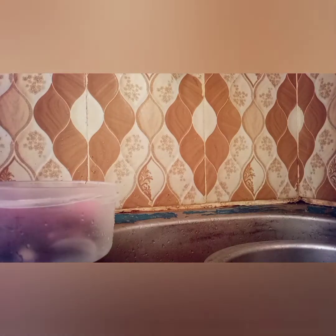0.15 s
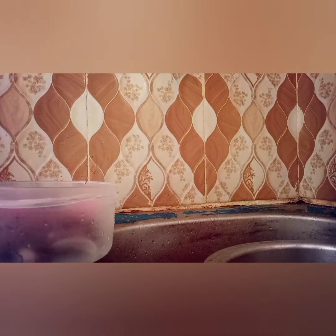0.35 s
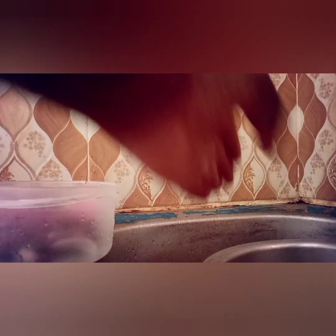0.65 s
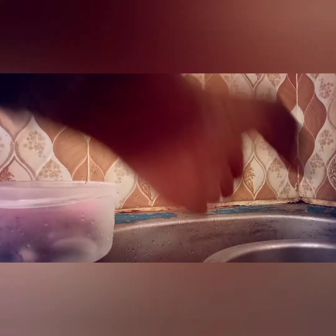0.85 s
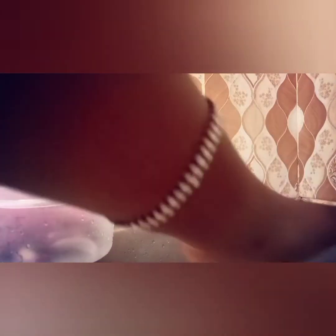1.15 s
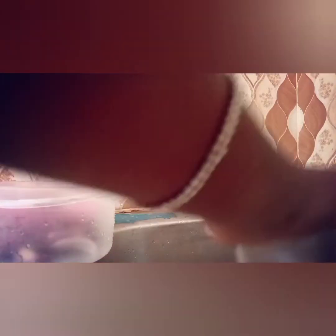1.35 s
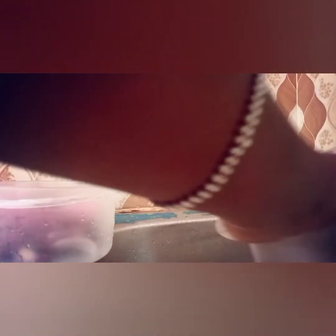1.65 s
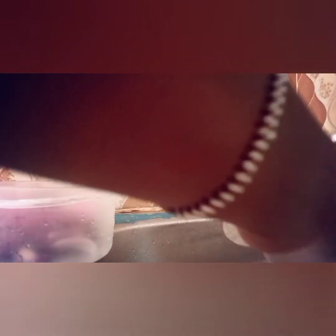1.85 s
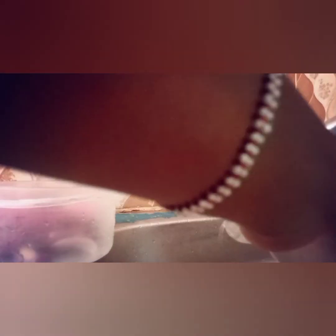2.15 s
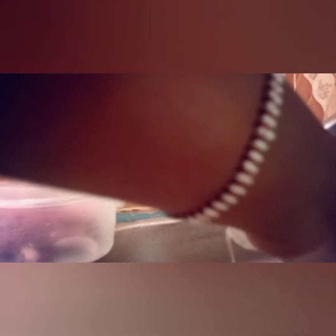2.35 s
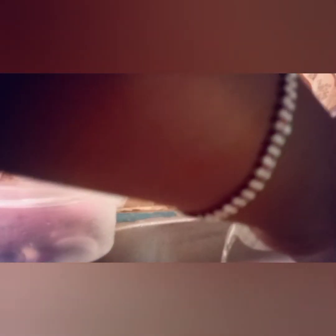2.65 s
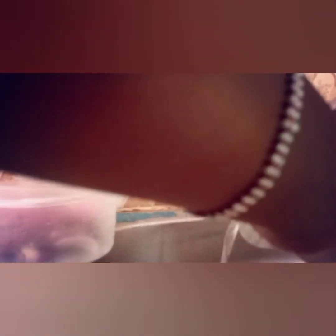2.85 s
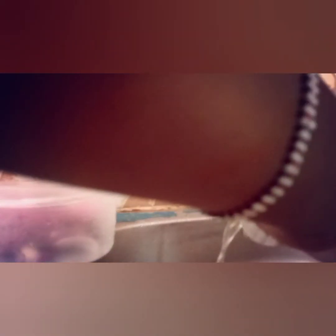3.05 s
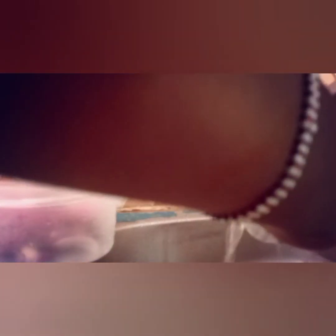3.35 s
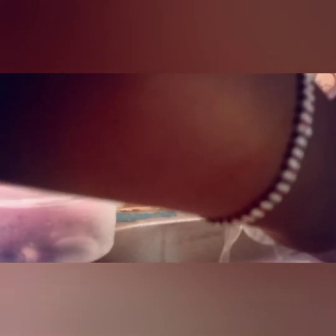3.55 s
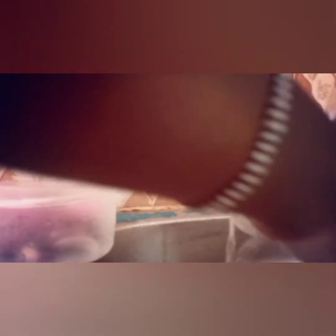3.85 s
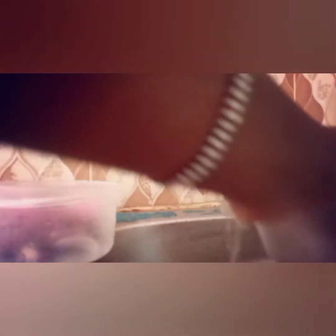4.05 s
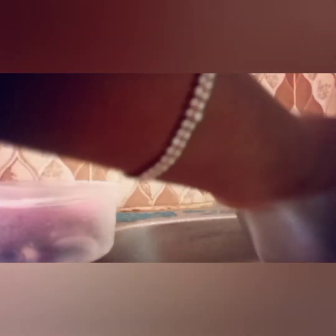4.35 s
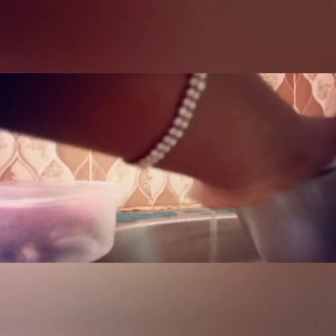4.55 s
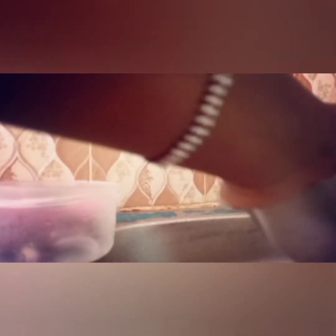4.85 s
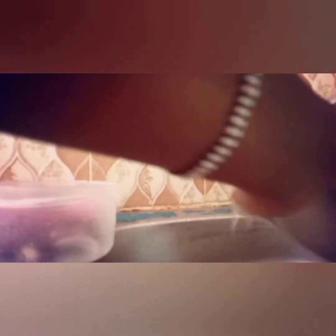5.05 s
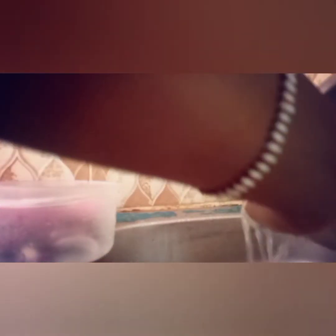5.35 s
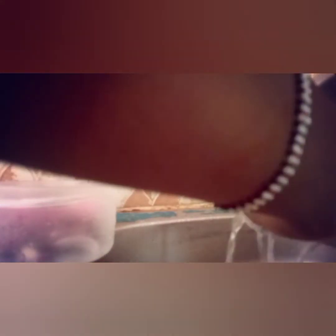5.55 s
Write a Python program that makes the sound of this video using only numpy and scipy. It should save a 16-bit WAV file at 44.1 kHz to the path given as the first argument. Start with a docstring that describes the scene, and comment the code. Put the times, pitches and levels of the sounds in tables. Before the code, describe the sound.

Close, small kitchen sink over a faint low drone. Wet crackling swishes of a hand come first, then dribbles and slaps of water on steel around two seconds, a cluster of bowl knocks with a glug near three, and finally heavier splashing pours. Stereo, with short tiled echoes.

```python
"""At a steel kitchen sink, in a room with a low drone, small dried fish are rinsed by hand in a bowl of water.
The hand swishes and squelches: crackling friction noise through broad peaks and the rubbed bowl's resonances.
Spilled water patters and drums on the steel, first in dribbles, then in longer pours: random impacts through
damped resonances. Air pockets ring as gliding sines; the bowl knocks and drips plink as sums of dying modes.
Two spaced microphone ports hear it all with echoes from the basin and the tiles."""
import sys
import numpy as np
from scipy import signal
from scipy.fft import rfft, irfft, next_fast_len
from scipy.io import wavfile
from scipy.ndimage import map_coordinates

SR = 44100
rng = np.random.default_rng(int(sys.argv[2]) if len(sys.argv) > 2 else 0)


def waveform_to_disk(signal):
    """Save audio, clipped to [-1, 1], as 16-bit WAV at the path in sys.argv[1]."""
    frames = np.transpose(np.atleast_2d(signal))
    scaled = np.clip(frames, -1, 1) * 32767
    samples = np.round(scaled).astype(np.int16)
    wavfile.write(sys.argv[1], SR, samples)


N = 251370  # samples
TOP_HZ = 15800  # band limit
PORT_LAG_S, BOWL_LAG_S = 0.0008845, 0.000857  # lead of the right port; the bowl stands nearer the middle

# resonances of the steel basin: (frequency [Hz], width [Hz], level [dB])
BASIN_MODES = [(110, 170, -25), (199.5, 19, -4.5), (241.6, 39, -6), (300.9, 28.7, 2.5), (362.4, 78, -10.5),
               (415.4, 26, -12), (600, 320, -22.5)]
# spectrum of fine spray: (frequency [Hz], level [dB per Hz])
SPRAY_SPECTRUM = [(800, -50), (2000, 2.5), (3000, -4.5), (5000, -0.5), (8000, 7), (12000, 7), (16000, 3.5)]


def amp(db):
    """The decibel law: level to amplitude gain."""
    return 10 ** (np.asarray(db) / 20)


def unit(x):
    """Normalization by mean power: scale to rms 1."""
    return x / np.sqrt(np.mean(x ** 2) + 1e-20)


def along(points, hz):
    """Interpolation of (Hz, value) points on a logarithmic frequency axis."""
    f, v = np.transpose(points)
    return np.interp(np.log(hz + 1), np.log(f + 1), v)


def wobble(rate):
    """Band-limited fluctuation: a smooth random curve with rate knots a second."""
    knots = rng.standard_normal(int(N * rate / SR) + 4)
    return map_coordinates(knots, [np.arange(N) * rate / SR])


def filtered(x, response):
    """Linear filtering: multiply the spectrum of x by a response of frequency."""
    n = x.shape[-1]
    m = next_fast_len(n + SR // 4)
    return irfft(rfft(x, m) * response(np.fft.rfftfreq(m, 1 / SR)), m)[..., :n]


def coloured(x, spectrum):
    """Spectral shaping: lay a (Hz, dB) spectrum on x."""
    return filtered(x, lambda hz: amp(along(spectrum, hz)))


def resonate(x, modes):
    """Modal superposition: a bank of damped resonances of alternating sign, driven by x."""
    def response(f):
        total = 0
        for k, (centre, width, db) in enumerate(modes):
            damping = 1j * f * width
            total = total + (-1) ** k * amp(db) * damping / (centre * centre - f * f + damping)
        return total
    return filtered(x, response)


def hump(x, centre_hz, octaves):
    """Broad resonance: one peak with soft skirts, cut in the bass."""
    def response(f):
        peak = 1 / (1 + (np.log2((f + 1) / centre_hz) / octaves) ** 2)
        return peak * f ** 2 / (f ** 2 + (centre_hz / 8) ** 2)
    return filtered(x, response)


def add(track, s, sound):
    """Superposition: mix a sound into the track at time s."""
    start = max(round(s * SR), 0)
    part = track[start:start + len(sound)]
    part += sound[:len(part)]


def impacts(rate, spread_db, size=N):
    """Shot noise: random tiny impacts, many weak and a few strong, of rms 1."""
    chance, strength = rng.random(size), rng.exponential(size=size)
    sign = rng.choice([-1, 1], size)
    return unit((chance < rate / SR) * sign * amp(spread_db * np.minimum(strength, 4)))


def fizz(rate, centre_hz, scatter, cycles, spread_db):
    """Bubble resonance: a cloud of small bubbles, each a short sine that rises as it dies, of rms 1."""
    when, size, pitch = rng.random((int(rate * N / SR), 3)).T
    hz = np.minimum(centre_hz * (pitch / (1 - pitch)) ** scatter, TOP_HZ)[:, None]
    age = np.arange(SR // 80)
    turns = hz * age / SR
    rings = np.sin(2 * np.pi * turns * (1 + 4 * age / SR)) * np.exp(-turns / cycles)
    rings *= amp(-spread_db * np.log(size + 0.029))[:, None]
    samples = (when * N).astype(int)[:, None] + age
    return unit(np.bincount(samples.ravel(), rings.ravel(), N)[:N])


def at_ports(x, lag_s):
    """Time difference of arrival: the sound reaches the right port first."""
    sides = np.array([[-1], [1]])
    return filtered(x, lambda hz: np.exp(1j * np.pi * hz * lag_s * sides))


def room():
    """Shaped noise: a low drone that wavers, with a weak mains hum and a faint steady hiss."""
    # level of the drone: (time [s], level [dB])
    drone_levels = [(0, -52), (.45, -57), (.67, -47.5), (.87, -61.5), (1.03, -49.5), (1.18, -55.5),
                    (1.27, -49), (1.47, -54.5), (1.85, -52), (2.12, -49), (2.5, -53.5), (2.9, -51.5),
                    (3.7, -55.5), (4.8, -56), (5.7, -50.5)]
    # brief swells and dips of the drone: (time [s], change [dB])
    surges = [(0.241, 6.5), (0.618, -9), (1.015, 8), (1.295, 6), (1.411, 12), (1.56, 5.5), (2.09, 9),
              (2.55, -16)]
    # spectra of drone and hiss: (frequency [Hz], level [dB per Hz])
    rumble_spectrum = [(20, -21), (38, -11.5), (50, -13.5), (62, -6.5), (100, 5), (130, 5), (165, -6),
                       (200, -2), (240, -26.5), (400, -38), (700, -84), (1500, -90)]
    hiss_spectrum = [(100, 21), (600, 9), (1200, 5), (3000, -1.5), (4300, 7.5), (6000, -54), (8600, 14),
                     (10000, -22), (16000, -6)]
    surge_s, waver_db, waver_hz = 0.013, 3.5, 14
    hum_hz, hum_db, hiss_db = 101.6, -68, -67.5
    diffuse_db = -16  # share of the drone that differs between the ports
    t = np.arange(N) / SR
    drone_db = np.interp(t, *np.transpose(drone_levels))
    surge_db = sum(db * np.exp(-((t - s) / surge_s) ** 2) for s, db in surges)
    level = amp(drone_db + surge_db + waver_db * wobble(waver_hz))
    drone = unit(coloured(rng.standard_normal(N), rumble_spectrum))
    diffuse = amp(diffuse_db) * unit(coloured(rng.standard_normal((2, N)), rumble_spectrum))
    hum = amp(hum_db) * unit(np.sin(2 * np.pi * hum_hz * t + 0.54 * wobble(2.3)))
    hiss = amp(hiss_db) * unit(coloured(rng.standard_normal((2, N)), hiss_spectrum))
    return at_ports(level * drone + hum, PORT_LAG_S) + level * diffuse + hiss


def pouring():
    """Exponential build-up and decay: each pour grows, holds and dries off over a steady dribble."""
    # water tipped over the rim of the bowl: (time [s], length [s], drumming [dB], wash [dB],
    # spray [dB], gurgle [dB])
    pours = [(1.869, 0.012, -54.5, -72, -84, -58), (1.964, 0.16, -65.5, -84, -78, -58.5),
             (2.082, 0.045, -48, -58, -59.5, -67), (2.194, 0.049, -42, -63, -58.5, -53.5),
             (2.45, 0.073, -58, -64.5, -79, -78), (2.628, 0.14, -58, -94, -59.5, -89),
             (2.782, 0.267, -44, -52, -52.5, -61.5), (3.086, 0.202, -48, -56.5, -54, -53),
             (3.36, 0.045, -48, -58, -63, -72), (3.506, 0.02, -41.5, -61, -52.5, -47),
             (3.555, 0.11, -54, -60.5, -60.5, -50.5), (4.112, 0.35, -59, -65, -59, -76),
             (4.733, 0.16, -50, -61, -53.5, -62.5), (4.817, 0.25, -46, -60, -46, -57.5),
             (5.141, 0.25, -42, -46.5, -44, -52.5), (5.4, 0.36, -40.5, -52.5, -47, -51.5)]
    rise_db_per_s, fall_db_per_s = 331, 200
    dribble_db = [[-68.5], [-76.5], [-68], [-88.5]]  # drumming, wash, spray, gurgle
    t = np.arange(N) / SR
    power = amp(dribble_db) ** 2
    for s, length, *levels_db in pours:
        before, after = np.maximum(s - t, 0), np.maximum(t - s - length, 0)
        shape_db = -rise_db_per_s * before - fall_db_per_s * after
        power = np.maximum(power, np.outer(amp(levels_db), amp(np.maximum(shape_db, -100))) ** 2)
    return 10 * np.log10(power)


def without_lows(x):
    """High-pass filtering: cut wash and gurgle steeply below the low mids, scale to rms 1."""
    cutoff_hz = 680
    return unit(filtered(x, lambda hz: hz ** 6 / (hz ** 6 + cutoff_hz ** 6)))


def spill():
    """Impact-driven resonance: falling water drums, washes through shifting hollows, gurgles and sprays."""
    # hollows in the sheet of water over the basin: (frequency [Hz], width [Hz], level [dB])
    wash_modes = [(700, 110, -9), (870, 155, -1), (1274, 115, 4), (1750, 140, -3.5), (1983, 160, -6),
                  (2235, 80, -10), (2800, 120, -10), (3630, 180, -14), (4050, 210, -10.5)]
    wash_drops_per_s, gurgles_per_s, gurgle_hz = 1100, 480, 990
    wash_shift, wash_gush_db = 0.039, 4.5  # fractional shift of the hollows; modulation by the slugs
    drum_db, wash_db, spray_db, gurgle_db = pouring()
    gush = wobble(35)  # the stream breaks into slugs
    gush_gain = amp(wash_gush_db * gush)
    drum = unit(resonate(impacts(700, 2.9) * amp(0.98 * gush), BASIN_MODES))
    hollows = np.zeros(N)
    for k in (-1, 0, 1):  # three sizes of hollow, whose levels wander independently
        drops = impacts(wash_drops_per_s, 2.8) * amp(5.4 * wobble(14))
        modes = [(hz * (1 + wash_shift * k), width, db) for hz, width, db in wash_modes]
        hollows += resonate(drops, modes)
    wash = without_lows(hollows * gush_gain)
    gurgle = without_lows(fizz(gurgles_per_s, gurgle_hz, 0.16, 5.0, 1.15) * gush_gain)
    # spray lands all around, so each port has its own
    mist = np.array([impacts(2000, 5.5) + .55 * fizz(400, 7000, .22, 11, 4) for port in range(2)])
    spray = unit(coloured(mist, SPRAY_SPECTRUM) * amp(2 * gush + 4.8 * wobble(70)))
    body = amp(drum_db) * drum + amp(wash_db) * wash + amp(gurgle_db) * gurgle
    return body + amp(spray_db) * spray


def swishes():
    """Stick-slip friction: wet fish slide through the fingers in a swell of crackle that rubs the bowl."""
    # strokes of the hand: (time of peak [s], swell [s], t60 [s], level [dB], centre [Hz],
    # width [octaves], rubbed bowl's level [dB], frequency rubbed hardest [Hz])
    strokes = [(.005, 0.0045, 0.5, -54.5, 4860, 1.6, -61, 830),
               (.068, 0.033, 0.45, -50, 7400, 0.69, -55, 3070),
               (.105, 0.025, 0.17, -60, 7000, 0.84, -77, 800),
               (.168, 0.032, 0.39, -54, 6360, 0.98, -61, 1900),
               (0.299, 0.084, 0.66, -63, 6000, 1.5, -72, 3020),
               (0.532, 0.028, 0.2, -44, 4900, 0.41, -44.5, 1440),
               (.562, 0.012, 0.12, -37, 6670, 0.098, -52, 2600),
               (.585, .015, 0.3, -47.5, 5230, 0.55, -52, 990),
               (.901, 0.16, 0.75, -40.5, 9500, 1.07, -59, 2270),
               (0.963, 0.082, 0.15, -41, 9050, 1.8, -59, 1940),
               (1.094, 0.026, 0.14, -35, 7700, 4.1, -50, 1320),
               (1.494, 0.018, 0.33, -54, 4320, 0.83, -56.5, 2850),
               (2.434, 0.013, 0.27, -52.5, 2030, 0.4, -56, 2320),
               (2.479, 0.015, 0.13, -42, 5020, 0.26, -54, 2470),
               (2.75, 0.016, 0.056, -39, 5560, 4.1, -62, 3200),
               (3.011, .08, 0.067, -41, 5750, 0.23, -55, 2800),
               (3.29, 0.02, 0.14, -46, 2800, 0.58, -53.5, 2880),
               (3.37, 0.027, 0.12, -49, 4600, 0.19, -63, 2400),
               (3.862, 0.036, 0.093, -48, 7340, 0.64, -65, 2770),
               (4.001, 0.07, 0.25, -40, 8400, 1.66, -69, 2200),
               (4.311, 0.0088, 0.18, -48, 3500, 0.86, -51, 2000),
               (4.338, 0.016, 0.24, -45, 4700, 0.35, -44.5, 1360),
               (4.429, 0.019, 0.29, -60, 4400, 0.18, -58.5, 1900),
               (4.538, 0.029, 0.13, -46.5, 7700, 0.58, -75, 1900),
               (4.672, 0.0078, 0.22, -40, 7700, 0.31, -60, 2270),
               (4.89, 0.11, 0.17, -47, 2600, 1.9, -64, 2500),
               (5.011, 0.035, 0.55, -47, 4160, 0.38, -51, 2340),
               (5.22, 0.073, 0.13, -37.5, 7000, 0.77, -50, 1900),
               (5.438, 0.05, 0.08, -37.5, 8300, 0.18, -67, 1600)]
    # resonances of the rubbed bowl: (frequency [Hz], width [Hz], level [dB])
    rub_modes = [(530, 98, 1), (780, 110, -5), (1216, 81, -0.5), (1663, 70, -1), (1890, 92, 1),
                 (2265, 90, -4), (2584, 190, -3.5), (3070, 80, 3), (3520, 120, -9)]
    rub_octaves, slip_db = 0.62, 2  # spread over the resonances; unevenness of the sliding
    out, t = np.zeros(N), np.arange(SR // 2) / SR
    slips = amp(slip_db * wobble(80))
    for s, rise, t60, db, hz, octaves, rub_db, rub_hz in strokes:
        swell = np.minimum(t / rise, 1) ** 2 * amp(-60 * np.maximum(t - rise, 0) / t60)
        crackle = impacts(2600, 3.4, size=len(t)) * np.roll(slips, -round(s * SR))[:len(t)]
        slide = unit(hump(crackle, hz, octaves))
        rub = unit(hump(resonate(crackle, rub_modes), rub_hz, rub_octaves))
        add(out, s - rise, swell * (amp(db) * slide + amp(rub_db) * rub))
    return out


def tones():
    """Phase-modulated oscillation: a faint, broken tone swells and fades, rising, level or sinking."""
    # thin tones that linger under the dribble: (time [s], length [s], level [dB], pitch [Hz],
    # glide [octaves per s])
    thin_tones = [(0.053, 0.052, -63, 1945, 0.074), (0.058, 0.095, -58.5, 801, -0.03),
                  (2.292, 0.3, -60.5, 794, -0.15), (3.2, .14, -47.5, 654, -0.0096),
                  (3.26, 0.18, -53.5, 962, -0.14), (3.271, 0.19, -62.5, 2240, 0.14),
                  (3.278, 0.16, -66, 3440, 0), (3.783, 0.05, -61, 898, 0.19), (3.821, 0.12, -58.5, 937, -2),
                  (3.894, 0.16, -63, 743, -1.26)]
    roughness, flutter_db = .05, 6  # random phase drift [radians in each sample]; unsteadiness of level
    out, t = np.zeros(N), np.arange(SR // 2) / SR
    for s, length, db, hz, glide in thin_tones:
        drift = roughness * rng.standard_normal(len(t))
        phase = np.cumsum(2 * np.pi * hz * 2 ** (glide * t) / SR + drift)
        level = amp(db + flutter_db * wobble(41.3)[:len(t)])
        swell = np.sin(np.pi * np.minimum(t / length, 1))
        add(out, s, level * swell * np.sin(phase))
    return out


def ticks():
    """Transient excitation: droplets burst with a bright snap, panned by level between the ports."""
    # droplets snapping close by: (time [s], peak [dB], pitch [Hz], left minus right [dB])
    snaps = [(.31, -48, 8100, 10), (0.669, -29.5, 13500, 9), (0.7382, -19.5, 11350, -1.5),
             (1.1563, -35, 13630, 0), (1.2523, -37, 9100, 0), (1.341, -41, 7700, 3), (1.61, -35.5, 9000, 3),
             (2.11, -30.5, 14800, 1), (2.21, -32.5, 14600, 7), (2.729, -40, 8800, -3),
             (2.809, -32.5, 9000, 6), (3.082, -23.5, 8800, 0.5), (3.4227, -20, 14300, 2),
             (4.257, -32, 4380, -6), (4.334, -28.5, 4930, -4), (4.506, -26, 8950, -8), (4.8, -28, 14900, 7),
             (4.8369, -25, 15200, 6), (4.913, -25.5, 13800, 13), (5.029, -18.5, 11300, -5),
             (5.066, -25, 9000, -5), (5.099, -15, 8540, -5.5), (5.146, -22, 13800, 7),
             (5.173, -24, 10000, 5), (5.194, -24.5, 7400, 0.5), (5.231, -28, 6300, 4),
             (5.304, -31.5, 5850, 1.5), (5.342, -23, 15000, 4), (5.356, -29.5, 8800, 1),
             (5.455, -25, 7800, 0), (5.466, -20, 15000, 6), (5.558, -20, 13000, 8), (5.618, -33, 7900, -6)]
    t60_s, octaves = 0.025, 0.35
    out, t = np.zeros((2, N)), np.arange(SR // 20) / SR
    for s, db, hz, pan_db in snaps:
        for track, side in zip(out, (1, -1)):
            burst = rng.standard_normal(len(t)) * (1 - np.exp(-t / 0.00098)) * amp(-60 * t / t60_s)
            snap = hump(burst, hz, octaves)
            add(track, s, amp(db + side * pan_db / 2) * snap / np.abs(snap).max())
    return out


def splats():
    """Impulse response: a slug of water bursts, rings its own hollow in the puddle and thumps the steel."""
    # slugs landing on the steel: (time [s], level [dB], thud relative to it before a trim [dB])
    slugs = [(0.526, -40, -3.5), (1.064, -42.5, -20), (1.849, -50, 1), (2.058, -31.5, -17), (2.124, -36, 1),
             (2.188, -31.5, -11), (2.221, -31.5, -1), (3.481, -44.5, -20), (3.5, -32.5, -13),
             (4.332, -37.5, -13), (4.711, -45, -19), (4.742, -43, -5), (4.819, -54, 9), (4.897, -36.5, -3),
             (5.002, -56, -12), (5.024, -39.5, -10), (5.07, -36, 4), (5.099, -35.5, -11),
             (5.113, -42.5, -11), (5.147, -35.5, -6), (5.187, -29.5, -4), (5.204, -28, 1.5),
             (5.216, -42, -8), (5.231, -23.5, -28), (5.321, -30.5, 7.5), (5.343, -35.5, 8),
             (5.376, -28.5, 4), (5.42, -44, 11), (5.441, -40.5, 5), (5.523, -32.5, -4), (5.546, -36, 5),
             (5.559, -22, 0.5), (5.583, -40, 7), (5.603, -35, 3), (5.622, -35, 12), (5.693, -18, 3)]
    # hollows in the puddle before each slug's scaling: (frequency [Hz], width [Hz], level [dB])
    puddle_modes = [(520, 264, -6), (740, 170, 2), (944, 140, 1), (1308, 144, 6.5), (1800, 77, -1.5),
                    (1993, 190, -6), (3230, 2900, -37)]
    burst_t60_s, thud_t60_s, spray_db = .04, 0.0073, -10.5  # decays of the drives; spray against the slug
    out, t = np.zeros(N), np.arange(SR // 6) / SR
    decay = amp(-60 * t / burst_t60_s)
    for s, db, thud_db in slugs:
        burst = rng.standard_normal(len(t)) * decay
        burst[0] += 4  # the first contact
        size = np.exp(0.036 * rng.standard_normal())
        slap = resonate(burst, [(hz / size, width, level) for hz, width, level in puddle_modes])
        thud = resonate(amp(-60 * t / thud_t60_s), BASIN_MODES)
        mist = coloured(rng.standard_normal(len(t)) * decay, SPRAY_SPECTRUM)
        parts = [(slap, 2), (thud, thud_db - 4.5), (mist, spray_db)]
        add(out, s, sum(amp(db + level) * x / np.abs(x).max() for x, level in parts))
    return out


def bubbles():
    """Bubble resonance: trapped air pinches off with a splash and rings at a gliding, unsteady pitch."""
    # air pockets in the water: (time [s], level [dB], starting pitch [Hz])
    pockets = [(1.0639, -25.5, 1215), (1.067, -32.5, 1950), (1.161, -40.5, 2173), (1.534, -42, 3150),
               (1.85, -38, 1270), (3.018, -26.5, 2330), (3.082, -22.5, 5300), (3.085, -40, 2630),
               (3.482, -34.5, 780), (3.501, -43, 1000), (4.023, -41.5, 2160), (4.077, -42.5, 2244),
               (4.236, -52, 2340), (4.2561, -27.5, 3484), (4.2664, -28, 2370), (4.522, -33, 1650),
               (4.839, -35.5, 2850), (4.898, -32, 2016), (4.92, -41, 2360), (5.0, -38.5, 2000),
               (5.071, -36, 2060), (5.099, -35, 3610), (5.147, -33, 720), (5.343, -33, 904),
               (5.377, -34, 1310), (5.441, -40, 970), (5.522, -31, 1260), (5.622, -38, 765)]
    t60_s, damping = 0.036, 0.37  # life at 1 kHz; higher bubbles die sooner by this power of the pitch
    rise_oct_per_s = 5
    out, t = np.zeros(N), np.arange(SR // 2) / SR
    rings = [(s, db, hz, t60_s * (1000 / hz) ** damping, rise_oct_per_s) for s, db, hz in pockets]
    # one big hollow glug that sags in pitch: time, level, pitch, t60, glide
    rings.append((3.169, -20.5, 689.7, 0.11, -0.78))
    for s, db, hz, t60, glide in rings:
        drift = .0009 * np.sqrt(hz) * rng.standard_normal(len(t))
        phase = np.cumsum(2 * np.pi * hz * 2 ** (glide * t) / SR + drift)
        ring = amp(-60 * t / t60) * np.sin(phase)
        splash = 0.25 * unit(hump(rng.standard_normal(len(t)), hz, 0.16)) * amp(-60 * t / 0.044)
        add(out, s, amp(db) * (1 - np.exp(-t / 0.0006)) * (ring + splash))
    return out


def drips():
    """Free modal vibration: a drip strikes the plastic bowl, which gives a short bright plink."""
    # drips: (time [s], peak [dB], pitch ratio [1])
    strikes = [(1.529, -39, 1.04), (1.6736, -33.5, 0.97), (1.707, -48, 1), (3.018, -30.5, .92)]
    # modes of the plink before the pitch ratio: (frequency [Hz], level [dB], t60 [s])
    plink_modes = [(2180, -8, 0.045), (2696, 6.5, 0.018), (3020, -4, 0.026), (3670, 3, 0.021)]
    out, t = np.zeros(N), np.arange(SR // 8) / SR
    hz, level, t60 = np.transpose(plink_modes)[:, :, None]
    for s, db, ratio in strikes:
        drift = np.cumsum(.03 * rng.standard_normal((len(plink_modes), len(t))), axis=1)
        modes = np.sin(2 * np.pi * hz * ratio * t + drift) * amp(level - 60 * t / t60)
        ring = np.sum(modes, axis=0) * (1 - np.exp(-t / 0.0005))
        add(out, s, amp(db) * ring / np.abs(ring).max())
    return out


def knocks():
    """Mass-loaded modal vibration: the water-filled bowl rings briefly, at new strengths for every contact."""
    # the bowl knocking in the sink: (time [s], peak [dB], tilt [dB per octave])
    contacts = [(2.7646, -17, 1.5), (2.82, -42, 9), (2.8765, -28.5, 2.5), (2.9203, -31, -10),
                (2.938, -41, -16), (2.99, -18.5, -7), (3.018, -28, 11), (3.0335, -20, -0.5),
                (3.0631, -29.5, -2.5), (3.0953, -26.5, -5), (3.1262, -19, -8.5), (3.1386, -24.5, 1),
                (3.1686, -24, -1), (3.1814, -26, 7.5)]
    # the bowl's modes before detuning: (frequency [Hz], level [dB], t60 [s], attack [s])
    bowl_modes = [(680, -14, 0.04, 0.0013), (1167, 4.5, 0.035, 0.001), (1270, 8, 0.02, 0.00042),
                  (1700, 4, 0.013, 0.00017), (2033, 7.5, 0.051, 0.0039), (2270, 3.5, 0.023, 0.00076),
                  (3090, -6, 0.014, 0.0006), (3630, -2.5, 0.023, 0.00056), (5330, -11.5, 0.018, 0.00038)]
    detune_share, slosh_share = .022, .55  # the water load shifts the modes a little and sloshes
    out, t = np.zeros(N), np.arange(SR // 6) / SR
    hz, level, t60, attack = np.transpose(bowl_modes)[:, :, None]
    for s, db, tilt_db in contacts:
        strength, detune, turn = rng.standard_normal((3, len(bowl_modes), 1))
        # the moving water roughens the ring
        drift = np.cumsum(.027 * rng.standard_normal((len(bowl_modes), len(t))), axis=1)
        phase = 2 * np.pi * (hz * (1 + detune_share * detune) * t + turn) + drift
        modes = np.sin(phase) * (1 - np.exp(-t / attack))
        mode_db = level + 2 * strength + tilt_db * np.log2(hz / 1800) - 60 * t / t60
        ring = np.sum(modes * amp(mode_db), axis=0)
        slosh = slosh_share * hump(rng.standard_normal(len(t)), 1800, 1.2) * amp(-60 * t / .045)
        add(out, s, amp(db) * (ring + slosh) / np.abs(ring + slosh).max())
    return out


def echoes(x, decay, low_hz):
    """Diffuse reverberation: a decaying noise tail for each port; long waves hardly scatter."""
    renewal_s = .2  # time between fresh random tails, crossfaded so that no single echo colour persists
    wet, hop = np.zeros((2, N + SR)), int(renewal_s * SR)
    padded = np.pad(x, ((0, 0), (hop, 2 * hop)))
    fade = np.sin(np.pi * np.arange(2 * hop) / (2 * hop))
    for start in range(0, N + hop, hop):
        hz, t, z = signal.stft(rng.standard_normal((2, SR // 5)), SR, nperseg=128)
        decaying = z * amp(-60 * t / along(decay, hz)[:, None])
        tail = signal.istft(decaying, SR, nperseg=128)[1]
        tail = np.pad(tail / np.linalg.norm(tail[0]), ((0, 0), (SR // 800, 0)))  # first-echo delay
        piece = padded[:, start:start + 2 * hop] * fade
        for track, part in zip(wet, signal.fftconvolve(piece, tail, axes=1)):
            add(track, start / SR, part)
    return filtered(wet[:, hop:hop + N], lambda f: f / np.hypot(f, low_hz))


def steel_ring(x):
    """Sympathetic resonance: the sheet steel radiates a quarter cycle behind its drive."""
    # resonances of the sink's sheet steel: (frequency [Hz], width [Hz], level [dB])
    steel_modes = [(420, 10, 1), (674, 8, -9), (791, 5, 0), (874, 5.3, -3.5), (965, 8, -2), (1180, 20, -9),
                   (1274, 16, -10), (1725, 40, -11), (2285, 20, -8), (2780, 13, -14), (3623, 28, -9),
                   (5300, 48, -16)]
    return amp(2) * filtered(resonate(x, steel_modes), lambda hz: -1j)


def scene():
    """Superposition of paths: direct sound, basin echoes, ringing steel and tiled wall over the drone."""
    # decay at the tiled wall: (frequency [Hz], t60 [s])
    tile_decay = [(200, 0.37), (1000, 0.21), (4000, 0.21), (16000, 0.14)]
    water = at_ports(spill() + splats() + tones() + swishes() + ticks(), PORT_LAG_S)
    bowl = at_ports(knocks() + bubbles() + drips(), BOWL_LAG_S)
    washing = water + bowl
    direct = filtered(washing, lambda hz: 1 / np.sqrt(1 + hz / 4000))  # the rim shades the treble
    basin = amp(-2.0) * echoes(washing, [(1000, 0.024), (16000, 0.0018)], 1600)
    # the close bowl sends less to the tiles
    wall = echoes(amp(-8.5) * water + amp(-10.5) * bowl, tile_decay, 380)
    return amp(-1.0) * (direct + basin + steel_ring(washing) + wall) + room()


def record(dry):
    """Frequency response: each port has its own resonances; nothing is kept above the band limit."""
    # responses of the two microphone ports: (frequency [Hz], gain [dB])
    left_port = [(60, -1), (200, 3.5), (380, 5), (560, 6.5), (720, 6.5), (1000, 0.5), (1300, -2),
                 (1650, 2.5), (2200, 3.5), (2700, 6.5), (3400, 4), (4400, 2.5), (6500, 2.5), (8600, 6.5),
                 (10500, -3.5), (12800, -13.5), (15000, 5)]
    right_port = [(60, -3.5), (200, -3.5), (380, 2), (560, 4.5), (720, 3.5), (1000, -2), (1300, -7),
                  (1650, 1.5), (2100, -6.5), (3000, 0), (4400, -5.5), (6500, -4.5), (8600, -21.5),
                  (11000, -1), (13700, 1.5), (15000, 7.5)]
    ports = np.array([coloured(dry[0], left_port), coloured(dry[1], right_port)])
    return filtered(ports, lambda hz: hz < TOP_HZ)


dry = scene()
out = record(dry)
waveform_to_disk(out)
```